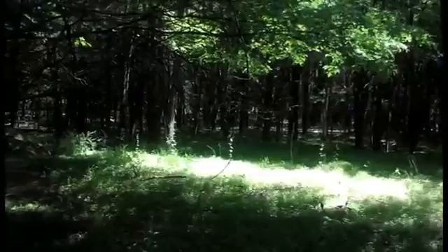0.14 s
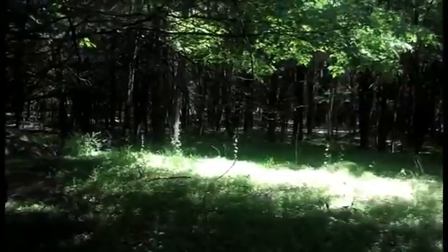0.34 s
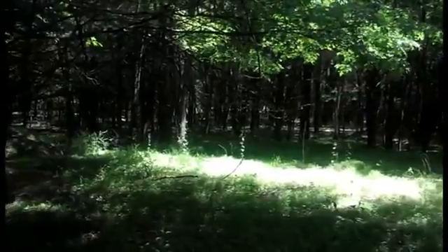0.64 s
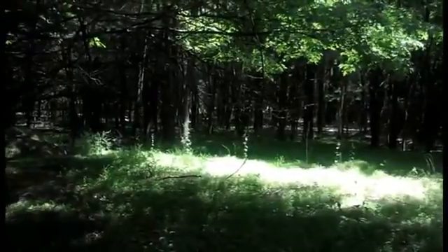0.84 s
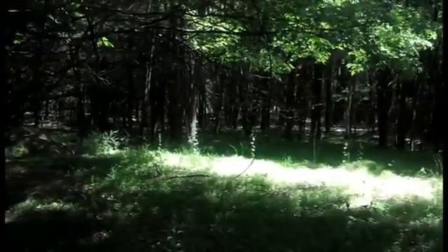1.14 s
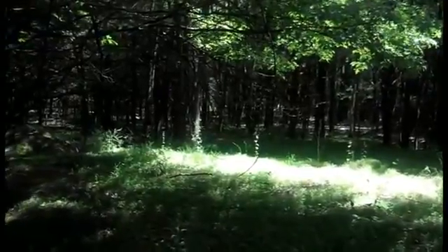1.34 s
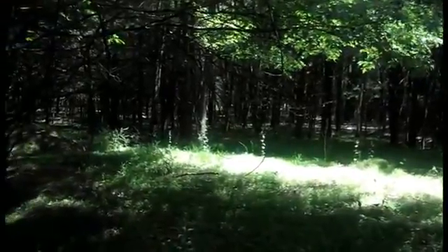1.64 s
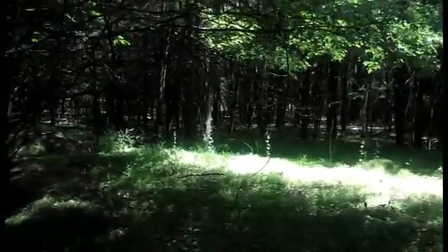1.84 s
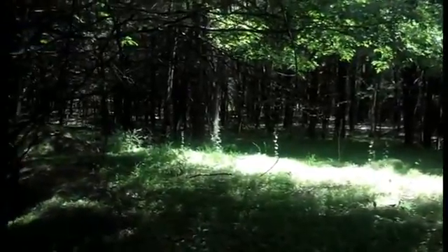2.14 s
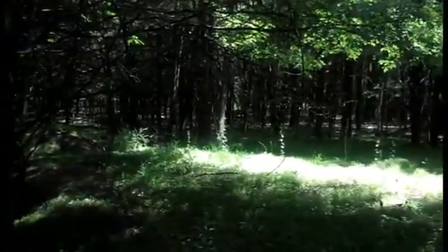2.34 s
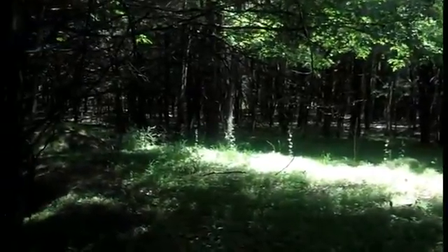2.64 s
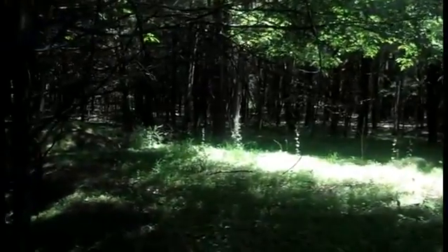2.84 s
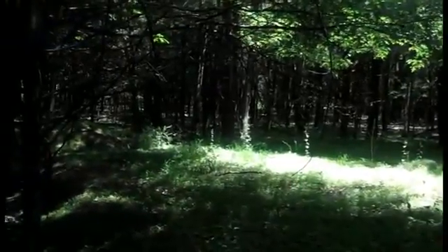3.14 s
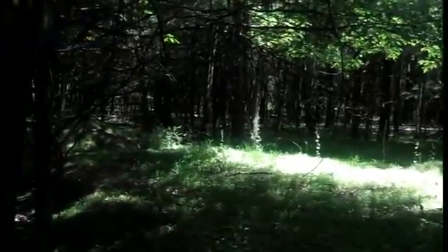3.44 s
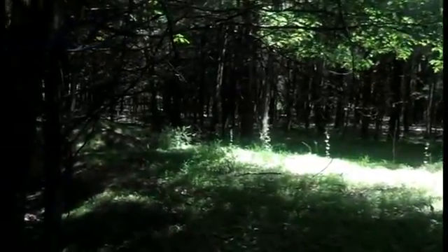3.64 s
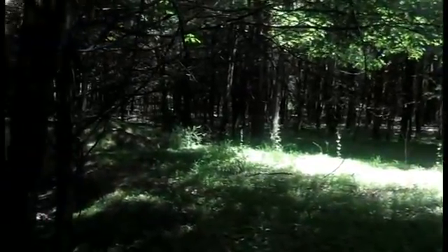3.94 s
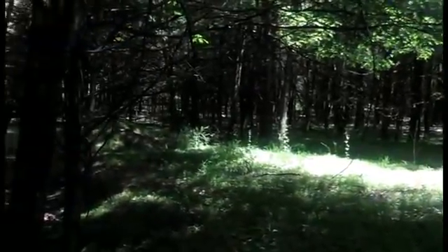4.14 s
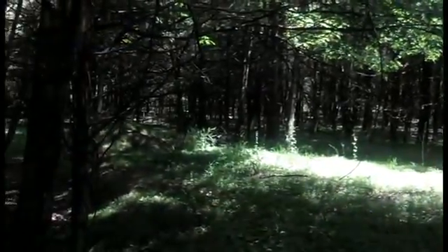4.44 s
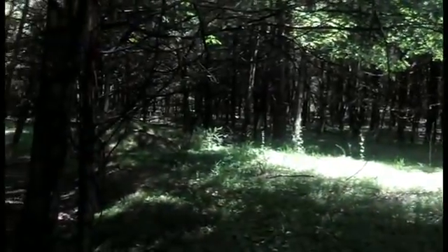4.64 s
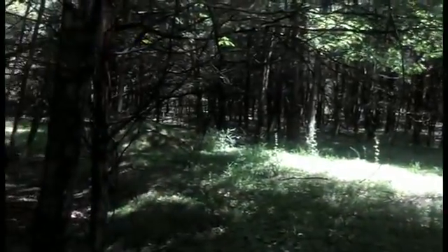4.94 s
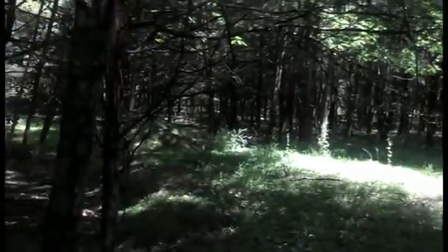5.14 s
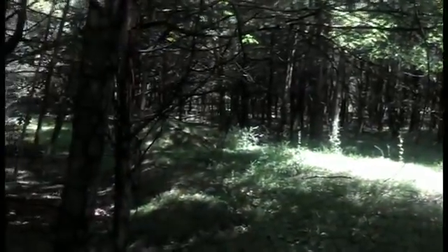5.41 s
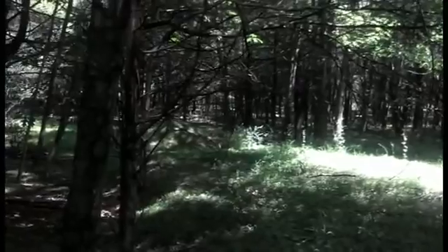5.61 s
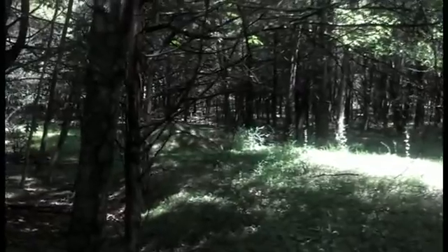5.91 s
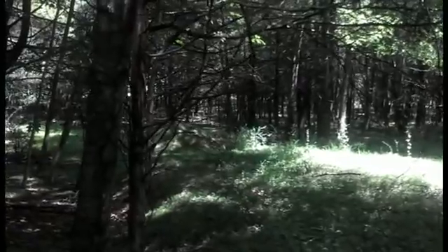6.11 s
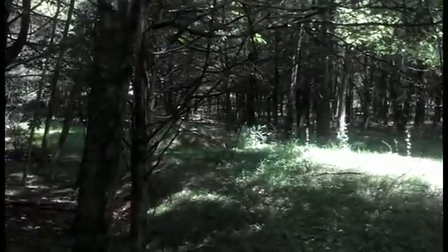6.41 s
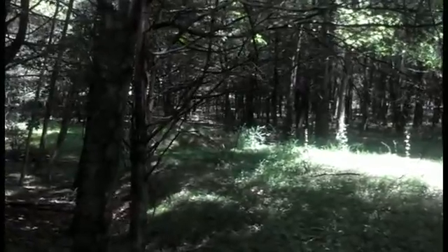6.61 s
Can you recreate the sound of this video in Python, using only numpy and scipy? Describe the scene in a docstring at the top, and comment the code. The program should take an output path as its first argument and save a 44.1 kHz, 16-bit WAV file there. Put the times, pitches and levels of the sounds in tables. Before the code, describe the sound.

Woodland cicadas hold one fluttering drone under a higher hiss, and late on, fingers bump the camera twice.

```python
"""A dense chorus of periodical cicadas drones in woodland, heard from a hand-held camera.
Hundreds of callers each hold a note near 1.3 kHz and slur it down; by superposition they form one drone.
A second kind hisses higher up, its tymbal clicks exciting resonances of the body. Fingers bump the
camera, twice hard. Behind lie a wash of far callers, softly rumbling air and faint microphone hiss."""
import sys
import numpy as np
from scipy import signal
from scipy.fft import rfft, irfft
from scipy.io import wavfile
from scipy.ndimage import uniform_filter1d, minimum_filter1d

SR = 44100
rng = np.random.default_rng(int(sys.argv[2]) if len(sys.argv) > 2 else 0)


def dump(signal):
    """Clip the signal to [-1, 1] and save it as 16-bit WAV at the path in sys.argv[1]."""
    limited = np.clip(np.atleast_2d(signal).T, -1, 1)
    pcm = np.round(limited * 32767).astype(np.int16)
    wavfile.write(sys.argv[1], SR, pcm)


N = 298557


def cicada_call(rate, length_s, hz, end_hz, slur_s=.3, slur_db=-17, waver=0.01721, buzz=0.31):
    """Modulation: the abdomen's wavering note throbs with the tymbals, then slurs down as it relaxes."""
    t = np.arange(int(length_s * rate)) / rate
    waver_hz, tymbal_hz = rng.uniform(2, 7), rng.uniform(70, 210)
    relax = np.sin(np.pi / 2 * np.clip((t - length_s) / slur_s + 1, 0, 1)) ** 2
    pitch = (hz + (end_hz - hz) * relax) * (1 + waver * np.sin(2 * np.pi * waver_hz * t))
    throb = 1 + buzz * np.sin(2 * np.pi * tymbal_hz * t)
    fade = np.clip(np.minimum(t / .2, (length_s - t) / .03), 0, 1)
    tone = np.sin(2 * np.pi * np.cumsum(pitch) / rate)
    return fade * throb * undb(slur_db * np.sqrt(relax)) * tone


def cicada_drone(hz=1339.2, spread_hz=95, core_hz=50, count=1300, db=-27, swell_db=0.74):
    """Beating: overlapping calls at neighbouring frequencies interfere, so their sum flutters."""
    step = 7  # the notes are low, so one sample in seven carries them
    chorus = np.zeros(N // step + 1)
    for k in range(count):
        rank = 2 * (k + .5) / count - 1  # from the lowest voice (-1) to the highest (1)
        offset_hz = -spread_hz * np.sign(rank) * np.log(1 - abs(rank))
        distance = rng.uniform(1, 2)
        strength = 1 / np.hypot(1, offset_hz / core_hz) / distance  # weaker off the common pitch
        phrase = cicada_call(len(chorus) * SR / N, length_s=rng.uniform(1.4, 2.4),
                             hz=hz + offset_hz, end_hz=839.6 + rng.uniform(-40, 40))
        start = rng.integers(len(chorus))
        chorus[(start + np.arange(len(phrase))) % len(chorus)] += strength * phrase
    drone = signal.resample_poly(chorus, step, 1)[:N]
    slow_rms = np.sqrt(smooth(drone ** 2, size=12000))
    return drone / slow_rms * undb(db + swell_db * drift(per_s=6))  # held level, slight random swells


# Body resonances of the higher cicadas. Each row: frequency in Hz, bandwidth in Hz, relative gain in dB.
CICADA_MODES = [(2644, 510, -1.5), (3840, 1070, -0.5), (4660, 1100, -5.5), (5440, 1300, -0.5),
                (6070, 1200, -3)]

def cicada_hiss(clicks_per_s=25000, cutoff_hz=6500, db=-53, rise_db=1.5, rise_s=1.7):
    """Impulse excitation: countless random tymbal clicks ring small bodies; the hiss builds, then holds."""
    clicks = (rng.random(N) < clicks_per_s / SR) * rng.standard_normal(N)
    hiss = sum(undb(mode_db) * resonate(np.roll(clicks, rng.integers(N)), hz, width)
               for hz, width, mode_db in CICADA_MODES)
    hiss = signal.sosfilt(signal.butter(10, cutoff_hz, fs=SR, output="sos"), hiss)
    shortfall_db = rise_db * np.maximum(1 - np.arange(N) / SR / rise_s, 0)
    return level(hiss, db - shortfall_db)


# Finger contacts. Each row: start in seconds, peak in dB before limiting, contact time constant in ms.
FINGER_TOUCHES = [(0.510, -37, 2.1), (1.603, -32.5, 1.5), (2.203, -35, 1.6), (3.383, -35.5, 0.93),
                  (4.448, -35, 0.42), (4.449, -23.5, 1.56), (4.490, -31, 1.2), (4.526, -27.5, 1.6),
                  (5.667, -25, 1.6), (5.801, -28.5, 1.2), (6.087, -33.5, 1), (6.1333, -0.4, 0.47),
                  (6.746, -5, 0.028)]
# Resonances of the camera body. Each row: frequency in Hz, bandwidth in Hz, relative gain in dB.
CAMERA_MODES = [(119, 70, -8), (256, 274, -1), (531, 180, 3), (830, 390, -5.5), (2230, 1500, -24),
                (4300, 1500, -31.5)]

def finger_knocks(nudge_count=10, nudge_soft_ms=1.8, lowest_hz=80, size=8192):
    """Modal response: touches and grip nudges push the camera; only brief contacts ring its high modes."""
    out = np.zeros(N + size)
    ms = 1000 * np.arange(size) / SR
    highpass = signal.butter(2, lowest_hz, btype="high", fs=SR, output="sos")
    nudges = [(rng.uniform(0, N / SR), rng.uniform(-40, -34), nudge_soft_ms) for _ in range(nudge_count)]
    for start_s, peak_db, soft_ms in [*FINGER_TOUCHES, *nudges]:
        push = ms ** 3 * np.exp(-ms / soft_ms)
        # neighbouring modes move the microphone in opposite directions
        ring = -sum((-1) ** k * undb(mode_db) * resonate(push, hz, width)
                    for k, (hz, width, mode_db) in enumerate(CAMERA_MODES))
        knock = signal.sosfilt(highpass, ring)
        start = int(start_s * SR)
        out[start:start + size] += undb(peak_db) * knock / np.abs(knock).max()
    return out[:N]


# Spectrum of the farthest callers. Each row: frequency in Hz, relative spectral density in dB.
FAR_SPECTRUM = [(715, -28), (780, -12), (855, -2), (1000, -5.5), (1150, 5), (1350, 10), (1550, 4),
                (1750, -5.5), (2000, -8.5), (2400, -14), (3100, -26.5)]

def far_cicadas(db=-39):
    """Incoherent summation: distant calls merge into a steady band of noise."""
    return level(noise(FAR_SPECTRUM), db)


# Spectrum of the woodland air. Each row: frequency in Hz, relative spectral density in dB.
AIR_SPECTRUM = [(20, -29.5), (38, -15.5), (62, -3.5), (95, 0.5), (140, 0.5), (190, -4), (270, -11.5),
                (420, -13), (700, -21), (3000, -30)]

def woodland_air(db=-46, stir_db=0.67):
    """Pressure fluctuation: softly stirring air makes a low rumble whose level drifts."""
    return level(noise(AIR_SPECTRUM), db) * undb(stir_db * drift(per_s=12))


# Spectrum of the microphone's hiss. Each row: frequency in Hz, relative spectral density in dB.
MIC_SPECTRUM = [(7200, 0), (8300, 0.5), (10500, -3.5), (12000, -2.5), (14000, -0.7)]

def microphone_hiss(db=-67):
    """Self-noise: the microphone adds a faint, steady hiss of its own."""
    return level(noise(MIC_SPECTRUM), db)


def undb(db):
    """Decibels to amplitude ratio."""
    return 10 ** (np.asarray(db) / 20)


def level(x, db):
    """Normalisation to an rms level."""
    return x * undb(db) / np.sqrt(np.mean(x ** 2))


def smooth(x, size):
    """Triangular smoothing: a moving average applied twice."""
    return uniform_filter1d(uniform_filter1d(x, size), size)


def drift(per_s):
    """Sample and hold: smoothed random steps with a spread near 1."""
    hold = int(SR / per_s)
    steps = rng.standard_normal(1000)[np.arange(N) // hold % 1000]
    return 1.3 * smooth(steps, hold)


def noise(points):
    """Spectral shaping: white noise follows (Hz, dB) points and falls away beyond the ends."""
    hz, db = np.transpose(points)
    octave = np.log2(np.maximum(np.arange(N // 2 + 1) * SR / N, 1))
    shape_db = np.interp(octave, np.log2([hz[0] / 2, *hz, hz[-1] * 2]), [db[0] - 18, *db, db[-1] - 19.5])
    return irfft(rfft(rng.standard_normal(N)) * undb(shape_db), N)


def resonate(x, hz, width):
    """Resonance with steep skirts: two identical band-passes in cascade, each `width` Hz wide."""
    b, a = signal.iirpeak(hz, hz / width, fs=SR)
    return signal.lfilter(b, a, signal.lfilter(b, a, x))


def scene():
    """Superposition: all sources add at one microphone."""
    foreground = cicada_drone() + cicada_hiss() + finger_knocks()
    return (foreground + far_cicadas() + woodland_air() + microphone_hiss())[None]


def record(dry, ceiling=0.75, hold_samples=10001, cutoff_hz=15000):
    """Peak limiting: the gain dips at the hardest knock and holds briefly; a low-pass cuts the top."""
    needed_gain = ceiling / np.maximum(np.abs(dry), ceiling)
    held_gain = minimum_filter1d(needed_gain, hold_samples, origin=hold_samples // 2)
    gain = uniform_filter1d(held_gain, size=200)
    return signal.sosfilt(signal.ellip(10, .2, 80, cutoff_hz, fs=SR, output="sos"), dry * gain)


dry = scene()
out = record(dry)
dump(out)
```